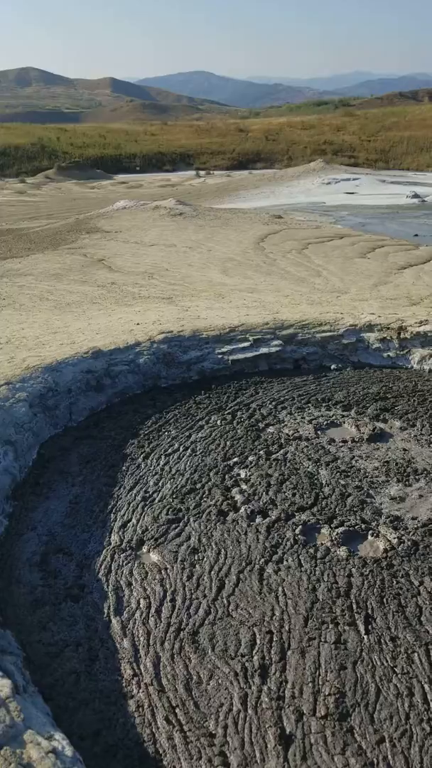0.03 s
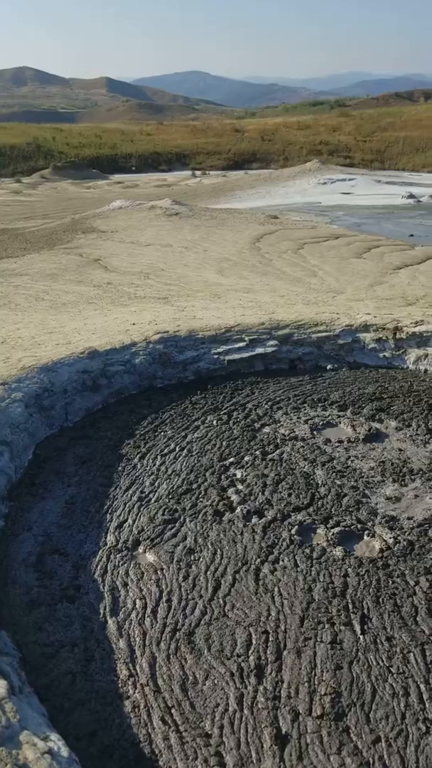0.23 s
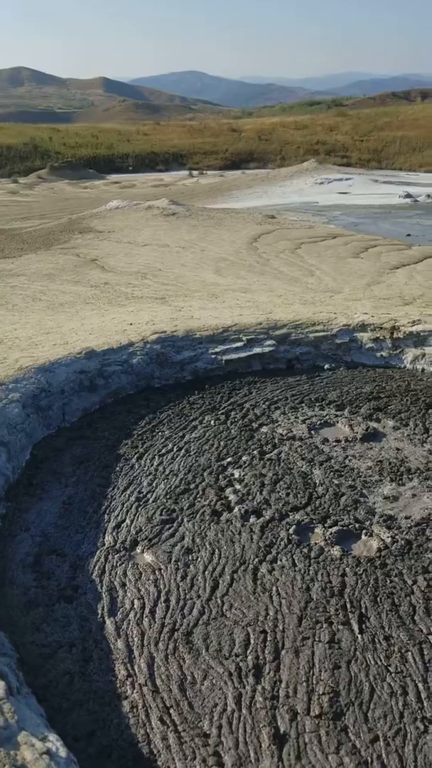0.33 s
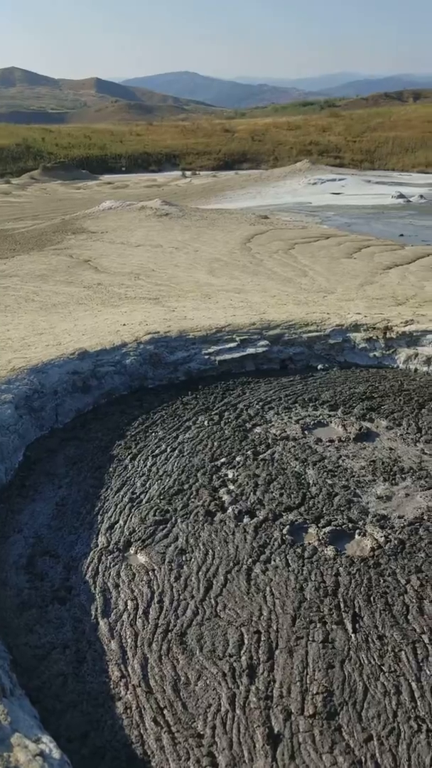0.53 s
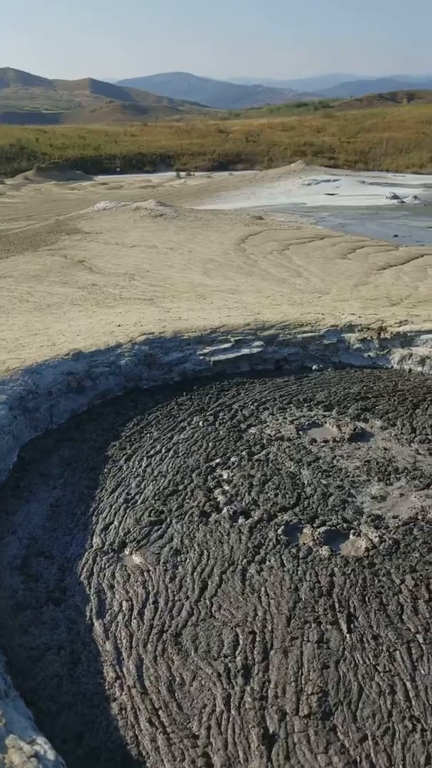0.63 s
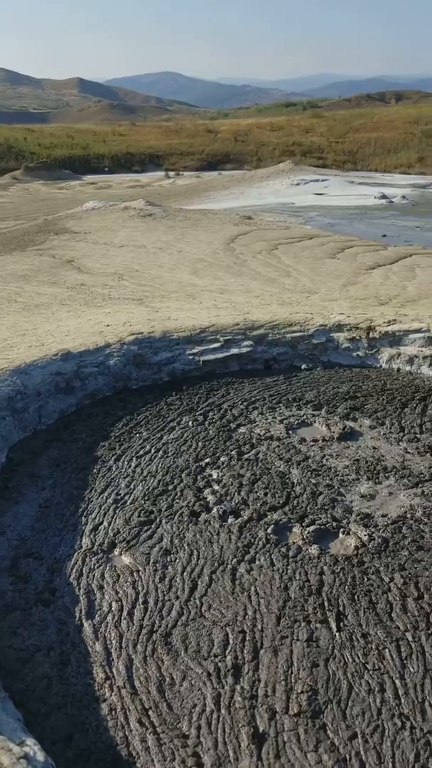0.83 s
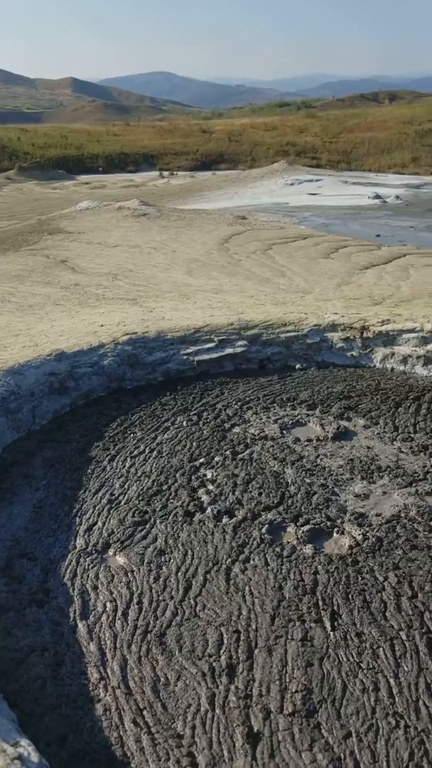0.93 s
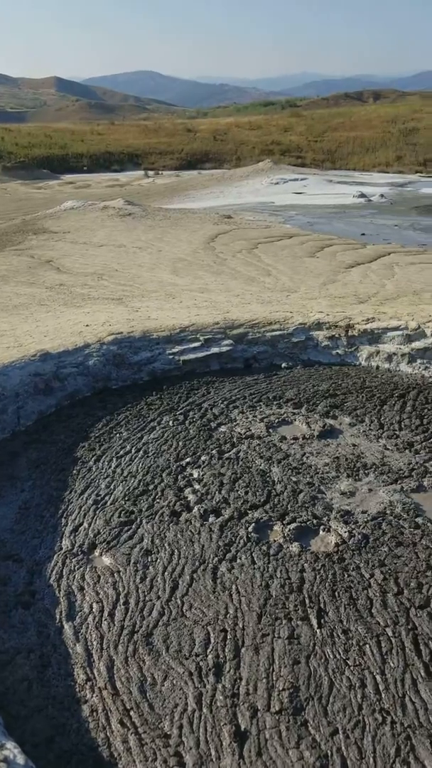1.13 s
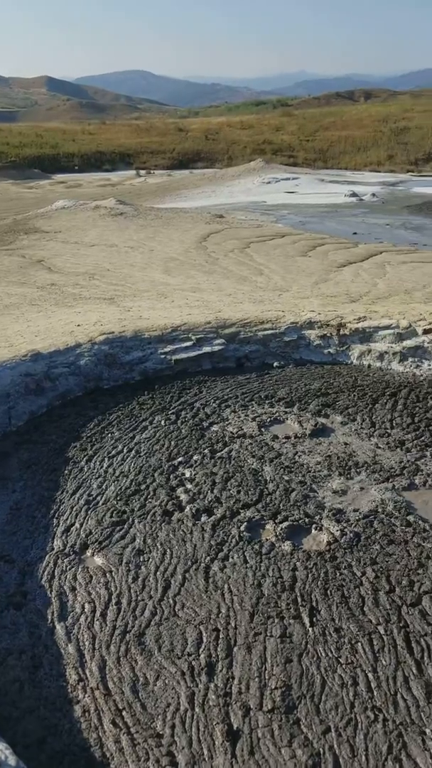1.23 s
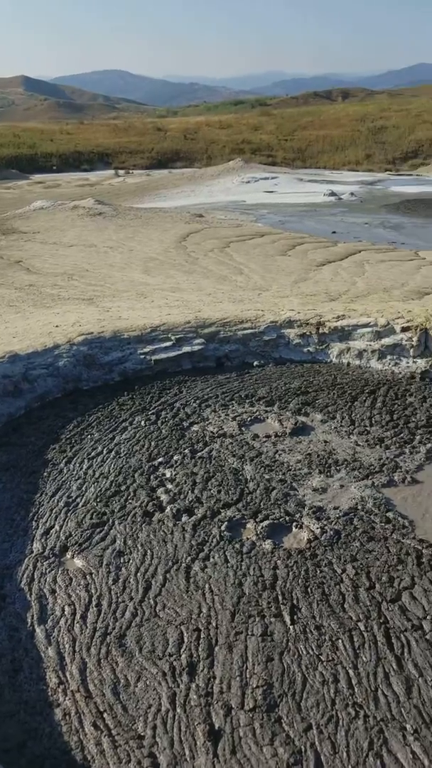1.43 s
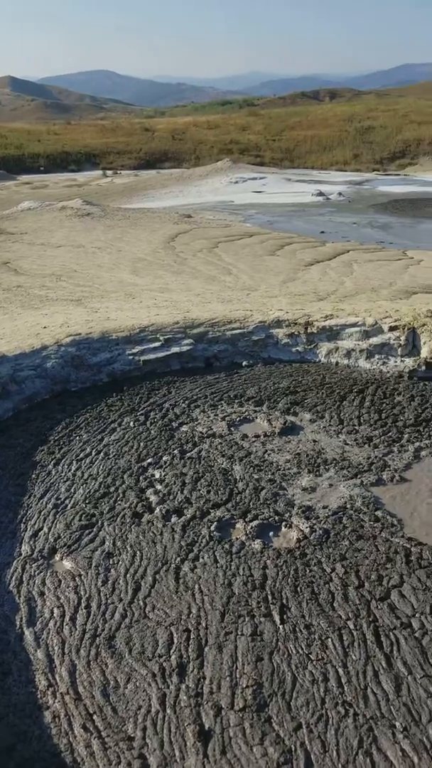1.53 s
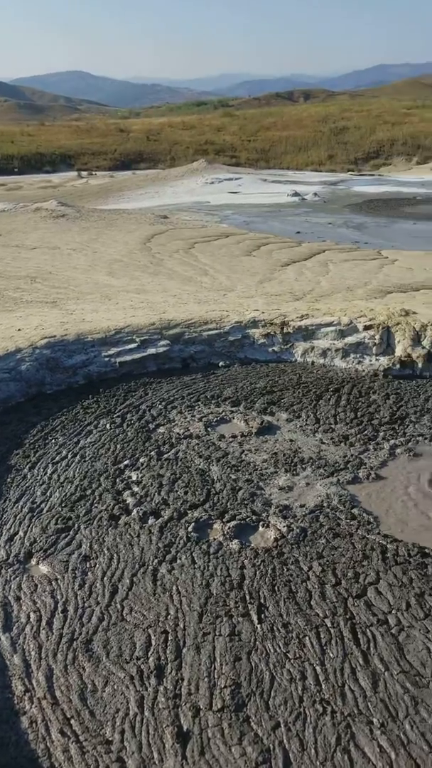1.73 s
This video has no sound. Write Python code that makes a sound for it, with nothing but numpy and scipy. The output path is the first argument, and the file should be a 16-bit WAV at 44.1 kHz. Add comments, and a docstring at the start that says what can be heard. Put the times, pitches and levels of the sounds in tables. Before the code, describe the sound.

Thick mud bubbles in an outdoor pool with small wet pops and a fine fizz. Near the end one large bubble gloops and spatters. Light wind rumbles on the microphone over a faint hiss, buffeting it once early on.

```python
"""Outdoors, at a pool of thick mud. Bubbles ring as their skins open, most gliding upward;
one large one gloops in two cavity modes and ends in a wet spatter. The crater's rim scatters
the pops and spatter. Tiny gas bubbles fizz throughout over a faint hiss, and light wind
rumbles on the microphone, once buffeting its left port."""
import sys
import numpy as np
from scipy import signal
from scipy.fft import rfft, irfft
from scipy.io import wavfile
from scipy.ndimage import uniform_filter1d

SR = 44100
rng = np.random.default_rng(int(sys.argv[2]) if len(sys.argv) > 2 else 0)


def file_out(sig):
    """Save sig as 16-bit WAV at sys.argv[1]."""
    # one column per channel
    cols = np.atleast_2d(sig).T
    # limit, then scale
    lim = np.clip(cols, -1, 1)
    pcm = np.round(lim * 32767).astype(np.int16)
    wavfile.write(sys.argv[1], SR, pcm)


N = 79380
TIME = np.arange(N) / SR
WOBBLE_S = 0.0028
# wet mud spectrum: freq_hz, gain_db
MUD_SPECTRUM = [(200, -25), (400, 3), (800, 1), (1700, -0.5), (2500, -11.5), (6000, -5)]


def bubbles(swell_share=0.19, fall_db=13, skin_db=-14, skin_decay_s=0.0024):
    """Each cavity swells, glides in pitch and dies in the thick mud; its tearing skin crackles."""
    # start_s, length_s, from_hz, to_hz, level_db, pan_db
    bursts = [(0.167, 0.019, 1380, 1620, -70, -16), (0.248, 0.01, 1640, 1710, -72, -11),
              (0.336, 0.052, 735, 1118, -72.5, 6.5), (0.39, 0.072, 548, 605, -70.5, 4),
              (0.408, 0.055, 222.4, 532, -56, -1), (0.454, 0.043, 615, 997, -61, 6.5),
              (0.56, 0.028, 532, 627, -66, 2), (0.58, 0.042, 850, 757, -72, -3),
              (0.772, 0.023, 380, 485, -63, 3), (0.79, 0.025, 773, 1075, -65, 5.5),
              (0.84, 0.0051, 3400, 3140, -69, -2), (0.906, 0.068, 353, 379, -62, -1.5),
              (0.912, 0.037, 432.5, 491, -56, -3), (0.916, 0.0088, 1444, 1780, -54, -7.5),
              (0.936, 0.012, 1710, 1650, -63.5, 0), (0.949, 0.036, 586, 790, -61.5, 7),
              (1.016, 0.0219, 773, 1230, -61, 3), (1.129, 0.01, 870, 770, -64.5, 6),
              (1.205, 0.14, 162.7, 177, -69.5, -4), (1.323, 0.03, 727, 830, -69.5, 7),
              (1.549, 0.035, 1740, 1790, -68, -7), (1.575, 0.01, 537, 630, -58, 0.5),
              (1.578, 0.018, 745, 1063, -47.5, 3.5), (1.594, 0.01, 1124, 1850, -56.5, -3),
              (1.6118, 0.0082, 1057, 892, -49.5, 3), (1.622, 0.014, 2140, 2230, -69.5, 14)]
    out = np.zeros((2, N))
    skin = colour(clicks(per_s=4200, spread_db=6.6, width=1.0), MUD_SPECTRUM)
    for start_s, length_s, from_hz, to_hz, level_db, pan_db in bursts:
        t = np.arange(int(2 * length_s * SR)) / SR
        u = t / length_s
        wobble = unit(smooth(rng.standard_normal(N), WOBBLE_S))[:len(t)]
        pitch_hz = from_hz * (to_hz / from_hz) ** np.minimum(u, 1) * (1 + 0.051 * wobble)
        swell = np.minimum(u / swell_share, 1) ** 0.19
        fall = amp(-fall_db * (np.maximum(u - swell_share, 0) / (1 - swell_share)) ** 2.68)
        ring = swell * fall * tone(pitch_hz)
        tear = amp(skin_db) * np.exp(-t / skin_decay_s) * skin[:, int(start_s * SR):][:, :len(t)]
        add(out, start_s, pan(pan_db) * amp(level_db) * (ring + tear))
    return out


def gloop(low_pan_db=-2.5, high_pan_db=4.5, edge_s=0.0055):
    """Two modes of the large cavity climb as its mouth widens."""
    # time_s, pitch_hz, level_db
    low_mode = [(1.428, 171, -51.5), (1.447, 195, -47.5), (1.482, 299, -35.5), (1.502, 379, -36.5),
                (1.512, 443, -46), (1.541, 472, -61)]
    high_mode = [(1.428, 318, -45), (1.451, 322.5, -48), (1.476, 470, -44.5), (1.493, 614, -49.5),
                 (1.515, 565, -55), (1.545, 705, -60.5)]
    out = np.zeros((2, N))
    for mode, pan_db in ((low_mode, low_pan_db), (high_mode, high_pan_db)):
        time_s, pitch_hz, level_db = np.transpose(mode)
        inside_s = np.minimum(TIME - time_s[0], time_s[-1] - TIME)
        edges = np.sin(np.pi / 2 * np.clip(inside_s / edge_s, 0, 1)) ** 2
        roughness = 1 + 0.1 * unit(smooth(rng.standard_normal(N), WOBBLE_S))
        level = edges * amp(np.interp(TIME, time_s, level_db)) * roughness
        out += pan(pan_db) * level * tone(np.interp(TIME, time_s, pitch_hz) * (TIME > time_s[0]))
    return out


def spatter(simmer_db=-85.5, rise_ratio=1.13):
    """Collapsing skins crackle through a shrinking hollow and throw spray; small pops simmer between."""
    # start_s, length_s, hollow_hz, squelch_db, spray_db
    collapses = [(0.087, 0.14, 990, -73, -85.5), (0.413, 0.034, 704, -67.5, -92),
                 (0.803, 0.21, 910, -70.5, -78.5), (0.904, 0.077, 930, -63, -68),
                 (0.955, 0.19, 707, -65, -80), (1.326, 0.02, 1080, -64.5, -98),
                 (1.475, 0.18, 584, -66.5, -93), (1.545, 0.12, 820, -66, -83),
                 (1.572, 0.06, 1120, -58, -73.5), (1.611, 0.028, 1210, -63.5, -67)]
    # freq_hz, gain_db
    spray_spectrum = [(1500, -1.5), (3200, 11.5), (15500, 4.5)]
    crackle = colour(clicks(per_s=5000, spread_db=4.4, width=0.83), MUD_SPECTRUM)
    spray = held(colour(clicks(per_s=1300, spread_db=1, width=0.63), spray_spectrum), 0.06)
    simmer = pops(per_s=270, spread_db=2.8, low_hz=620, high_hz=3020, cycles=2.93, width=0.52)
    out = amp(simmer_db) * colour(simmer, MUD_SPECTRUM)
    for start_s, length_s, hollow_hz, squelch_db, spray_db in collapses:
        u = np.arange(int(length_s * SR)) / (length_s * SR)
        span = (int(start_s * SR) + np.arange(len(u))) % N
        pitch_hz, bandwidth_hz = hollow_hz * rise_ratio ** u, 0.71 * hollow_hz
        hollow = resonate(crackle[:, span], pitch_hz, bandwidth_hz)
        squelch = unit(resonate(hollow, pitch_hz, bandwidth_hz))
        arch = np.sin(np.pi * u ** 0.24) ** 0.81
        add(out, start_s, arch * (amp(squelch_db) * squelch + amp(spray_db) * spray[:, span]))
    return out


def rim(x, level_db=-16.5, t60_s=0.2, build_s=0.035):
    """Short, dull scatter from the mud walls."""
    t = TIME[:N // 8]
    scatter = colour(rng.standard_normal((2, len(t))), [(100, 14), (1800, 7.8), (8000, 6)])
    taps = scatter * amp(-60 * t / t60_s) * np.minimum(t / build_s, 1)
    return signal.fftconvolve(x, taps / np.linalg.norm(taps[0]), axes=1)[:, :N] * amp(level_db)


def fizz(pan_db=-3, tick_decay_s=0.0033):
    """Tiny gas bubbles prickle; single ones tick sharply."""
    # freq_hz, gain_db
    spectrum = [(1000, -21.5), (3000, -1), (4800, -10.5), (7000, -1), (9500, -9.5), (11500, 2),
                (15500, 0.5)]
    # time_s, level_db
    prickle_levels = [(.07, -82.5), (.43, -72.5), (1.39, -72), (1.66, -68), (1.8, -74)]
    # start_s, level_db
    ticks = [(.164, -59), (.179, -58.5), (0.843, -77), (0.9174, -55), (1.572, -60), (1.595, -51),
             (1.6205, -56), (1.6515, -55.5)]
    gas = pops(per_s=9000, spread_db=2.6, low_hz=1430, high_hz=SR / 3, cycles=1.38, width=1.58)
    prickle = amp(curve(prickle_levels)) * colour(gas, spectrum)
    tick_level = sum(amp(level_db) * np.exp(-abs(TIME - start_s) / tick_decay_s) * (TIME >= start_s)
                     for start_s, level_db in ticks)
    return pan(pan_db) * (prickle + tick_level * colour(rng.standard_normal((2, N)), spectrum))


def wind():
    """Independent rumble on the two ports; eddies thump them and one gust flutters on the left."""
    # time_s, level_db
    left_levels = [(.07, -65.5), (.16, -40), (.24, -58), (.4, -47.5), (.74, -49), (.88, -63.5),
                   (1.18, -65.5), (1.54, -57), (1.7, -68)]
    right_levels = [(.07, -60), (.27, -46.5), (.52, -62), (.66, -49), (.82, -57), (1.38, -72), (1.52, -55),
                    (1.7, -79)]
    gust_levels = [(.56, -51.5), (.592, -29.5), (.645, -28.5), (.655, -42), (.7, -37)]
    # freq_hz, gain_db
    rumble_spectrum = [(18, -38), (40, 0), (110, -6.5), (200, -23.5), (600, -53), (2000, -125)]
    gust_spectrum = [(25, -15), (70, -6.5), (95, 5.5), (125, -11), (160, -4), (220, -14.5), (1500, -70)]
    # centre_s, width_s, level_db, pan_db
    eddies = [(0.131, 0.0022, -44.5, 16), (0.169, 0.0057, -39.5, -3), (0.277, 0.0085, -43.5, -4),
              (0.405, 0.0037, -43, 18.5), (0.674, 0.0013, -37, 25), (.765, 0.0024, -45, 18)]
    rumble = held(colour(rng.standard_normal((2, N)), rumble_spectrum), 0.065)
    out = rumble * amp([curve(left_levels), curve(right_levels)])
    gust = amp(np.interp(TIME, *np.transpose(gust_levels), -np.inf, -np.inf))
    out[0] += smooth(gust, 0.00055) * held(colour(rng.standard_normal(N), gust_spectrum), 0.046)
    for centre_s, width_s, level_db, pan_db in eddies:
        u = (TIME - centre_s) / width_s
        out += pan(pan_db) * amp(level_db) * np.cos(2 * u) / (1 + u ** 2) * np.exp(-(u / 4) ** 2)
    return out


def hiss(level_db=-72.5):
    """Steady outdoor hiss."""
    # freq_hz, gain_db
    spectrum = [(100, 2.5), (2500, -13), (5000, -20.5), (16000, -16.5)]
    return amp(level_db) * colour(rng.standard_normal((2, N)), spectrum)


def pops(per_s, spread_db, low_hz, high_hz, cycles, width, sizes=16):
    """Random tiny bubbles, each a few cycles that bend upward."""
    out = np.zeros((2, N))
    for pitch_hz in np.geomspace(low_hz, high_hz, sizes):
        u = np.arange(int(5 * cycles * SR / pitch_hz) + 2) * pitch_hz / (cycles * SR)
        ring = u * np.exp(-2 * u) * np.sin(2 * np.pi * cycles * u * (1 + u / 20))
        ring = np.sqrt(pitch_hz) * ring / np.linalg.norm(ring)
        out += signal.oaconvolve(clicks(per_s / sizes, spread_db, width), ring[None], axes=1)[:, :N]
    return out


def clicks(per_s, spread_db, width):
    """Random clicks of uneven size, scattered over a stereo width."""
    size = amp(spread_db * np.minimum(rng.exponential(1, N), 5)) * rng.choice([-1, 1], N)
    angle = np.pi / 4 + width * rng.uniform(-1.13, 1, N)
    return size * (rng.random(N) < per_s / SR) * np.array([np.cos(angle), np.sin(angle)])


def resonate(x, pitch_hz, bandwidth_hz):
    """Resonance along a pitch curve."""
    turn = np.exp(2j * np.pi * np.cumsum(pitch_hz) / SR)
    pole = np.exp(-np.pi * bandwidth_hz / SR)
    return 2 * (turn * signal.lfilter([1 - pole], [1, -pole], x / turn)).real


def tone(pitch_hz):
    """Sine along a pitch curve, rms 1."""
    return np.sqrt(2) * np.sin(2 * np.pi * np.cumsum(pitch_hz) / SR)


def colour(x, spectrum):
    """Filters by (freq_hz, gain_db) points, to rms 1."""
    freq_hz, gain_db = np.transpose(spectrum)
    bins_hz = np.fft.rfftfreq(x.shape[-1], 1 / SR)
    gain = amp(np.interp(np.log(bins_hz + 1), np.log(freq_hz), gain_db))
    return unit(irfft(rfft(x) * gain, x.shape[-1]))


def smooth(x, window_s):
    """Moving average, twice."""
    size = max(int(window_s * SR), 1)
    return uniform_filter1d(uniform_filter1d(x, size), size)


def held(x, window_s):
    """Evens out swells slower than the window."""
    return x / np.sqrt(abs(smooth(x ** 2, window_s)) + 1e-9)


def amp(db):
    """Decibels to gain."""
    return 10 ** (np.asarray(db) / 20)


def unit(x):
    """Scales to rms 1."""
    return x / np.sqrt(np.mean(x ** 2) + 1e-20)


def curve(points):
    """Joins (time_s, value) points over the scene."""
    return np.interp(TIME, *np.transpose(points))


def pan(pan_db):
    """Stereo gains, left over right by pan_db."""
    return amp(np.array([[pan_db], [-pan_db]]) / 2)


def add(mix, start_s, sound):
    """Mixes in a stereo sound."""
    part = mix[:, max(round(start_s * SR), 0):][:, :sound.shape[1]]
    part += sound[:, :part.shape[1]]


def scene():
    """Mud pool, rim and open air."""
    mud = bubbles() + spatter()
    return gloop() + mud + rim(mud) + fizz() + hiss() + wind()


def record(dry):
    """Quick fade-in, then low-pass."""
    fade_span_s, cutoff_hz = (0.064, 0.082), 15800
    faded = dry * np.interp(TIME, fade_span_s, [0, 1])
    taps = signal.firwin(511, cutoff_hz, window=("kaiser", 9), fs=SR)
    return signal.oaconvolve(faded, taps[None], "same")


dry = scene()
out = record(dry)
file_out(out)
```